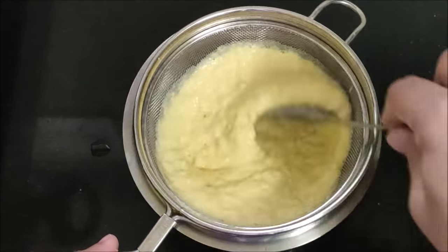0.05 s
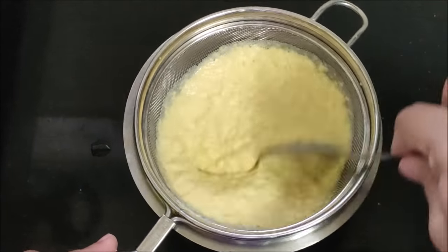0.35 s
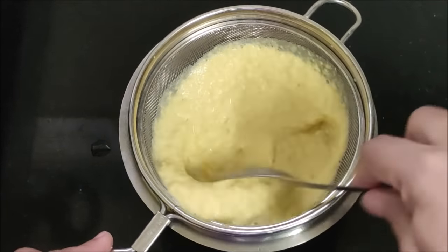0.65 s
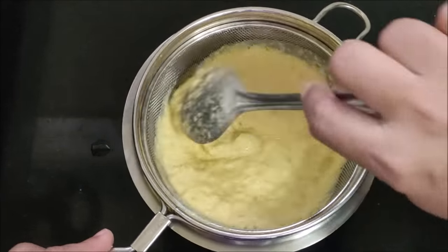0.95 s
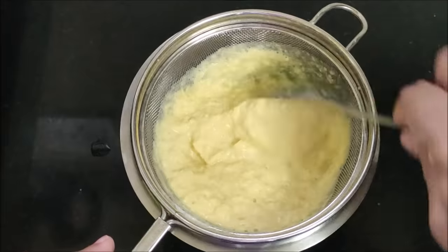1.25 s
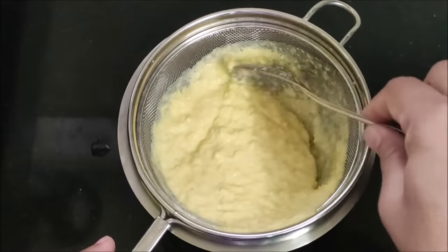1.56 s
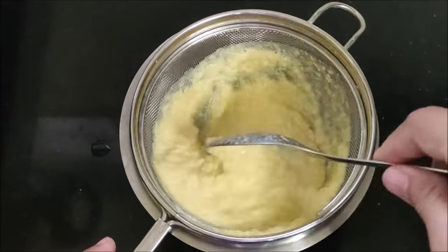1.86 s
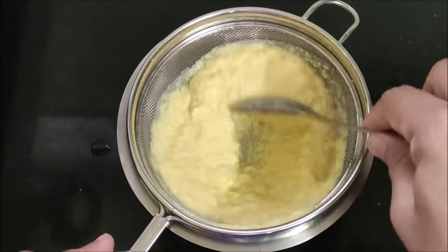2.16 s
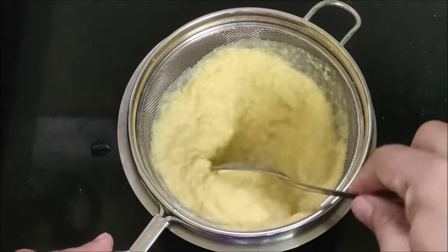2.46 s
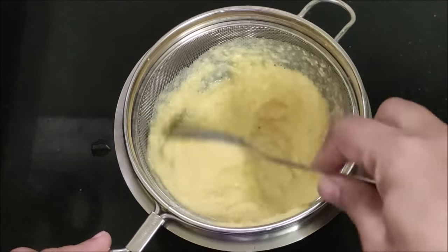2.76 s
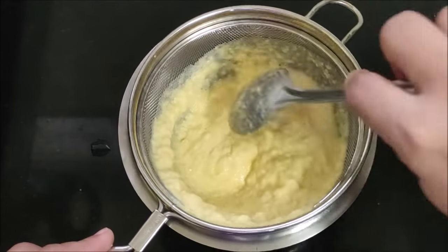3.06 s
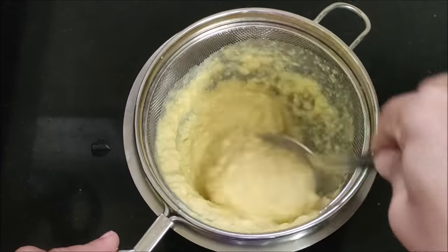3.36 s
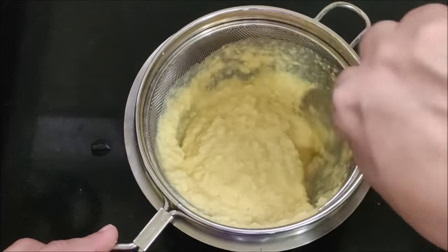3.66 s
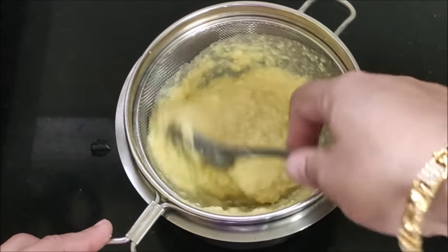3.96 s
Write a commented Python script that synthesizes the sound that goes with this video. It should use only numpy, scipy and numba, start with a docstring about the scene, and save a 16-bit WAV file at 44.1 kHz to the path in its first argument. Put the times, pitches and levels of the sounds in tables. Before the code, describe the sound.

A metal spoon scrapes thick paste through a wire strainer in short, rasping strokes.

```python
"""A metal spoon pushes thick paste through a wire strainer resting on a steel bowl, in a faintly humming kitchen.
From the start, short scrapes rasp and grind by stick-slip friction; the mesh drones at the wire-crossing rate
and the bowl rings. After a lull the spoon lands with a tick and a knock at 1.1 s, then squeals and zips
near 1.35 s. Scattered strokes and knocks follow, each with a short room tail, and a dense run of scrapes
from 3.7 s ends the scene."""
import sys
import numpy as np
from scipy import signal
from scipy.fft import rfft, irfft
from scipy.io import wavfile
from scipy.ndimage import map_coordinates
from numba import njit

SR = 44100
rng = np.random.default_rng(int(sys.argv[2]) if len(sys.argv) > 2 else 0)


def waveform_to_disk(signal):
    """Save audio, clipped to [-1, 1], as 16-bit WAV at the path in sys.argv[1]."""
    frames = np.transpose(np.atleast_2d(signal))
    scaled = np.clip(frames, -1, 1) * 32767
    samples = np.round(scaled).astype(np.int16)
    wavfile.write(sys.argv[1], SR, samples)


N = 176400

# Levels in the tables are relative; each source and the mix apply their own gains.
# Still kitchen air: frequency_hz, density_db
AIR_SPECTRUM = [(15, -14), (26, 8.5), (60, -7), (90, -5.5), (125, -12.5), (250, -13.5), (500, -23.5),
                (1000, -28), (3000, -35.5), (9000, -40), (16000, -42)]
# Harmonics of an appliance: pitch_hz, level_db
HUM_PARTIALS = [(49, -54), (98.5, -65), (147.5, -71.5)]
# Reverberation time by band: frequency_hz, t60_s
ROOM_DECAY = [(100, 0.11), (500, 0.68), (1400, 0.5), (4000, 0.6), (10000, 0.41), (16000, 0.24)]
# Normal modes of strainer and bowl: pitch_hz, level_db, t60_s
BOWL_MODES = [(243.4, -1.5, 0.41), (272.7, -1.5, 0.12), (301.4, -1, 0.32), (357, 1.5, 0.19),
              (452.6, 7.5, 0.14), (581, -12.5, 0.95), (611, -3.5, 0.33), (831, -4, 0.1), (1096, -2.5, 0.14),
              (1200, -1, 0.074), (1330, -4.5, 0.12), (1430, 1.5, 0.065), (1622, -12, 0.1),
              (2190, -40, 0.038)]
# The spoon lands or the strainer shifts: start_s, tick_db, tick_decay_s, knock_db, knock_cutoff_hz
IMPACTS = [(.075, -44.5, 0.0027, -45.5, 1360), (.275, -35.5, 0.005, -45, 1000),
           (.658, -33.5, 0.0085, -49, 1390), (.83, -40, 0.0042, -48.5, 2000),
           (1.128, -37.5, 0.0042, -40, 1013), (1.142, -44.5, 0.0037, -47, 991),
           (1.224, -44.5, 0.004, -56, 1380), (1.351, -27, .003, -61, 1390),
           (1.671, -38.5, .003, -39.5, 1400), (2.071, -31.5, 0.0025, -38.5, 1100),
           (2.422, -41.5, 0.0022, -37, 401), (2.718, -40, 0.0082, -47.5, 1395),
           (3.241, -37.5, 0.0027, -43, 895), (3.262, -35.5, 0.0031, -39, 700),
           (3.606, -44, 0.0048, -50, 1408), (3.682, -55.5, .003, -51.5, 1404)]
# Crunch of the wires at an impact: frequency_hz, density_db
TICK_SPECTRUM = [(200, -25), (700, -3), (1300, 7.5), (2500, 0), (4500, -0.5), (7500, 4.5), (12000, 6),
                 (16000, 0)]
# The edge catches and sings: start_s, rise_s, hold_s, pitch_hz, level_db
SQUEAL_EVENTS = [(0.138, .002, 0.012, 1190, -49), (0.289, .008, 0.0087, 1220, -38.5),
                 (0.301, .006, 0.019, 1514, -42.5), (0.446, 0.0099, 0.012, 1250, -45.5),
                 (.656, 0.0048, 0.019, 1113, -32.5), (.657, 0.0032, 0.015, 1282, -41),
                 (.829, 0.0025, 0.0055, 1294, -40.5), (.83, 0.0032, .014, 1120, -45),
                 (1.325, 0.022, .015, 1476, -37), (1.358, 0.0047, 0.0096, 1410, -27.5),
                 (1.393, .005, 0.016, 1120, -38), (1.395, 0.0046, 0.011, 1640, -48.5),
                 (2.161, 0.0029, 0.019, 1087, -41), (2.486, .015, 0.013, 1632, -41.5),
                 (2.5, 0.0087, 0.012, 1396, -38.5), (3.728, .01, 0.054, 1430, -44.5),
                 (3.836, .01, 0.021, 1432, -43)]
# The edge runs evenly over the wires: start_s, rise_s, hold_s, nominal_crossing_hz, level_db
ZIP_EVENTS = [(1.354, 0.012, 0.026, 487.4, -34), (1.391, 0.0041, 0.01, 556, -37),
              (3.764, 0.007, 0.048, 477.2, -43)]
# Timbre of a zip: frequency_hz, density_db
ZIP_SPECTRUM = [(480, 9), (950, -14), (1450, -10), (2000, 15), (2450, 1), (2900, -55), (3900, 9), (5000, 3),
                (6400, 6), (10000, -8), (16000, -14)]
# Rub of the spoon's edge: frequency_hz, density_db
RUB_SPECTRUM = [(400, -33), (880, -11), (1120, -0.5), (1420, 1), (1700, -9), (2300, -11.5), (4000, -32.5)]
# Resonances of the mesh under hard grinding: centre_hz, width_hz, level_db
GRIND_RESONANCES = [(832, 120, 9), (1046, 120, -0.5), (1990, 210, -3.5), (2274, 230, -5.5),
                    (3350, 116, -4.5), (4300, 600, -2.5), (6100, 500, -7)]
# Bright resonances of single wires: centre_hz, width_hz, level_db
WIRE_RESONANCES = [(5730, 95, -2), (6830, 105, 0.5), (8110, 230, -3), (9310, 320, 3.5), (10660, 240, 1),
                   (12300, 270, -0.5), (14200, 220, -4.5)]
# Rasp of the wires: frequency_hz, density_db
RASP_SPECTRUM = [(150, -44), (300, -41), (850, -16.5), (1300, -11), (2200, 4.5), (3000, 2), (4200, 0.5),
                 (5200, -4.5), (6800, 2.5), (9300, 4), (12000, 2), (14500, 1), (16000, -12.5)]
# Strokes of the spoon: start_s, rise_s, hold_s, crossing_hz, rasp_db, rub_db, drone_db, grind_db
STROKES = [ (-.02, .014, 0.046, 500, -45.5, -49.5, -37, -48.5),
           (0.138, 0.0034, 0.011, 500.4, -54.5, -46, -49, -60),
           (0.155, 0.0085, 0.061, 490, -57, -68, -51.5, -61),
           (0.276, 0.02, 0.022, 458, -34.5, -40, -25.5, -52),
           (0.344, .007, 0.059, 480, -48.5, -59, -36.5, -56),
           (0.424, 0.0064, 0.034, 520, -40.5, -44, -45, -50),
           (0.539, 0.026, 0.032, 499, -50, -55.5, -49, -69),
           (0.651, 0.011, 0.016, 561.2, -34.5, -38, -36, -41),
           (.68, 0.0037, .016, 480.3, -45, -58, -27.5, -56), (.708, 0.013, 0.082, 510, -52, -65, -39, -70),
           (.812, .02, 0.0052, 548.4, -56, -44, -51.5, -64),
           (1.229, 0.031, 0.064, 490, -47.5, -55.5, -48.5, -55.5),
           (1.331, .014, 0.0089, 561.6, -31, -35.5, -47.5, -53),
           (1.362, 0.013, 0.027, 545, -29, -40.5, -44.5, -44),
           (1.671, 0.0058, 0.05, 480, -39, -41.5, -37.5, -46),
           (1.735, 0.017, 0.027, 475, -30.5, -37, -28, -40),
           (1.779, 0.01343, 0.035, 375, -46, -45, -34.5, -46.5),
           (2.141, 0.0055, 0.03, 450, -45.5, -45, -40, -51.5),
           (2.189, 0.014, 0.017, 510, -58.5, -69, -44, -62.5),
           (2.459, .02, 0.023, 490, -43.5, -44.5, -40.5, -53),
           (2.497, .006, .012, 490, -37, -49, -32.5, -42.5),
           (2.712, 0.0072, 0.027, 474, -33, -40.5, -43, -40),
           (2.743, 0.0059, 0.04, 490, -38, -42, -37, -43),
           (2.8, .025, 0.025, 440.1, -32, -35.5, -28.5, -36.5),
           (2.864, 0.0053, 0.036, 436.9, -44.5, -47.5, -32, -48.5),
           (3.243, 0.0095, 0.068, 441.5, -40, -44, -43, -47),
           (3.343, 0.061, 0.015, 490.1, -41, -42, -50, -41),
           (3.672, 0.01, 0.082, 463.7, -45, -49, -53.5, -51),
           (3.714, 0.041, 0.06, 472.3, -31.5, -41.5, -33.5, -45),
           (3.814, 0.012, 0.02, 446.4, -33.5, -42, -28, -41),
           (3.846, 0.026, 0.059, 425.9, -36.5, -42, -38, -36.5),
           (3.882, 0.067, .09, 469.4, -32, -39.5, -41.5, -35)]

WOBBLE_HZ, FLUTTER_DB = 249.5, 3.5  # rate of the tones' random wavering; spread of their level
TONE_RELEASE_S = 0.0082  # squeals and zips


def undb(db):
    """Amplitude ratio of a level in decibels."""
    return 10 ** (np.asarray(db) / 20)


def unit(x):
    """Normalisation to an rms of 1."""
    return x / np.sqrt(np.mean(x ** 2))


def along(points, hz):
    """Interpolation of (frequency_hz, value) points on a logarithmic frequency axis."""
    p = np.array(points)
    return np.interp(np.log(hz + 1), np.log(p[:, 0]), p[:, 1])


def colour(x, spectrum):
    """Spectral shaping that conserves the power of white noise."""
    hz = np.arange(N + 1) * SR / (2 * N)
    return irfft(rfft(x, 2 * N) * unit(undb(along(spectrum, hz))))[:N]


def wander(hz):
    """Random modulation: interpolated Gaussian values with a spread near 1."""
    knots = rng.standard_normal(8000)
    return np.sqrt(1.5) * np.interp(np.arange(N) / SR * hz, np.arange(len(knots)), knots)


def pole(x, hz, kind):
    """First-order low-pass or high-pass filter."""
    return signal.lfilter(*signal.butter(1, min(hz, SR / 3), kind, fs=SR), x)


def pressure(t, start, rise, hold, release):
    """Contact envelope: a linear rise, a hold and an exponential release."""
    bearing_down = np.clip((t - start) / max(rise, .001), 0, 1)
    return bearing_down * np.exp(-np.maximum(t - start - rise - hold, 0) / release)


def wavering_phase(hz, wobble):
    """Frequency modulation: phase is the integral of a wavering rate."""
    return 2 * np.pi * np.cumsum(hz * (1 + wobble * wander(WOBBLE_HZ))) / SR


@njit
def resonance(x, hz, width):
    """Damped resonator: a state-variable band-pass with a moving centre."""
    y, band_state, low_state = np.empty(len(x)), 0., 0.
    for i in range(len(x)):
        g, damping = np.tan(np.pi * hz[i] / SR), width / hz[i]
        band = (band_state + g * (x[i] - low_state)) / (1 + g * (g + damping))
        band_state = 2 * band - band_state
        low_state += 2 * g * band
        y[i] = damping * band
    return y


def background(t, air_db=-54.5, air_width=0.39):
    """Superposition of broadband air noise and an appliance's harmonic hum."""
    mid, side = (unit(colour(rng.standard_normal(N), AIR_SPECTRUM)) for _ in range(2))
    hum = sum(undb(db) * unit(np.sin(2 * np.pi * (hz * t + 0.033 * wander(2.58) + rng.random())))
              for hz, db in HUM_PARTIALS)
    return hum + undb(air_db) * (mid + air_width * side * np.array([[1], [-1]]))


def kitchen(x, early_db=-1.5, early_s=0.016, tail_db=-6, build_s=0.011, wide_hz=405, lag_s=32e-6):
    """Reverberation: direct sound, reflections off bowl and worktop, and a diffuse tail, in stereo."""
    t = np.arange(SR // 2) / SR
    hz = np.arange(len(t) // 2 + 1) * SR / len(t)
    mid, side = rfft(rng.standard_normal((2, len(t))))
    side *= hz ** 2 / np.hypot(hz ** 2, wide_hz ** 2)  # the room is wider in the treble
    diffuse = np.array([mid + side, mid - side]) / np.sqrt(2)
    early = np.exp(-t / early_s) * (t > .001)
    response = undb(early_db) * pole(irfft(diffuse) * early, hz=730, kind="high") / np.linalg.norm(early)
    for centre, t60 in ROOM_DECAY:
        band = along([(f, float(f == centre)) for f, _ in ROOM_DECAY], hz)
        tail = np.exp(-np.log(1000) * t / t60) * np.minimum(t / build_s, 1)
        response += undb(tail_db) * irfft(diffuse * band)[:, ::-1] * tail / np.linalg.norm(tail)
    delay = np.exp(-2j * np.pi * np.arange(N // 2 + 1) * SR / N * lag_s)
    direct = np.array([irfft(rfft(x[0]) * delay, N), x[1]])  # reaches the left side later
    return direct + signal.fftconvolve(x, response, axes=1)[:, :N]


def bowl_ring():
    """Modal superposition: the impulse response of strainer and bowl, with unit energy."""
    t = np.arange(SR // 2) / SR
    ring = sum((-1) ** k * undb(db) * np.cos(2 * np.pi * hz * t) * np.exp(-np.log(1000) * t / t60)
               for k, (hz, db, t60) in enumerate(BOWL_MODES))
    return ring / np.linalg.norm(ring)


def impacts(t, ring):
    """Impulsive excitation: the wires crunch briefly and a cushioned blow rings the bowl."""
    crunch, blows = np.zeros(N), np.zeros(N)
    tick_gain, knock_gain = 2, 2 * np.sqrt(0.02 * SR)
    for start, tick_db, decay_s, knock_db, cutoff_hz in IMPACTS:
        crunch += undb(tick_db) * (t >= start) * np.exp(-np.abs(t - start) / decay_s)
        impulse = 1e-18 + (np.arange(N) == int(start * SR))
        blows += undb(knock_db) * pole(impulse, cutoff_hz, "low")
    ticks = colour(tick_gain * crunch * rng.standard_normal(N), TICK_SPECTRUM)
    return ticks + signal.fftconvolve(knock_gain * blows, ring)[:N]


def squeals(t, overtone_db=-23.5):
    """Stick-slip oscillation: the spoon's edge sings in short, unsteady harmonic tones."""
    out = np.zeros(N)
    phase_per_hz = wavering_phase(1, wobble=.027)
    flutter = unit(undb(FLUTTER_DB * wander(WOBBLE_HZ)))
    for start, rise, hold, hz, db in SQUEAL_EVENTS:
        on = (t > start) & (t < start + .5)
        phase = hz * phase_per_hz[on]
        tone = np.sin(phase) + undb(overtone_db) * sum(np.sin(k * phase) for k in range(2, 6))
        out[on] += undb(db) * pressure(t[on], start, rise, hold, TONE_RELEASE_S) * unit(tone)
    return out * flutter


def rim_echo(x, reflection=0.76, lag_s=0.0006966, swing=0.365, travel_hz=12):
    """Comb filtering: a wave returns from the rim along a path that changes as the spoon travels."""
    lag = lag_s * SR * np.exp(swing * wander(travel_hz))
    return (x + reflection * map_coordinates(x, [np.arange(N) - lag])) / np.hypot(1, reflection)


def zips(t, rate_ratio=0.96):
    """Periodicity pitch: one click per wire makes a buzz, just below the nominal crossing rate."""
    out = np.zeros(N)
    cycles_per_hz = wavering_phase(rate_ratio, wobble=0.0132) / (2 * np.pi)
    for start, rise, hold, hz, db in ZIP_EVENTS:
        clicks = np.sinc((hz * cycles_per_hz % 1 - .5) * SR / hz)
        out += undb(db) * pressure(t, start, rise, hold, TONE_RELEASE_S) * unit(clicks)
    return colour(rim_echo(out), ZIP_SPECTRUM)


def snags(grip, per_s=5200, spread_db=3):
    """Shot noise: the edge catches on the wires in random impulses of very uneven size."""
    sizes = rng.choice([-1, 1], N) * undb(spread_db * np.minimum(rng.exponential(size=N), 5))
    return unit((rng.random(N) < per_s / SR) * sizes * grip)


def ringing_wires(x, resonances, drift=0.041, flicker_db=4, shift_hz=30.25):
    """Resonance: snags ring stretches of wire whose pitch and strength shift as the edge moves on."""
    out = np.zeros(N)
    for hz, width, db in resonances:
        gain = undb(db + flicker_db * wander(shift_hz))
        centre = hz * np.exp(drift * wander(shift_hz))
        out += gain * resonance(x, centre, float(width))
    return unit(out)


def mesh_drone(phase, skew_rad=0.29, turn_hz=43.3, octave_db=-25.5):
    """Forced vibration, once per wire: the swinging patch shifts, so the two sides hear it out of step."""
    skew = skew_rad * wander(turn_hz) * np.array([[1], [-1]])
    tone = np.sin(phase + skew) + undb(octave_db) * np.sin(2 * phase)
    return unit(tone * undb(FLUTTER_DB * wander(WOBBLE_HZ)))


def wire_rasp(envelope, grip, width=0.94, bright_db=-1.5):
    """Extended source: the mesh is broad and close, so each side hears shared snags and its own."""
    shared, left, right = (rim_echo(colour(snags(grip) * envelope, RASP_SPECTRUM)) for _ in range(3))
    broadband = (shared + width * np.array([left, right])) / np.hypot(1, width)
    bright = np.array([ringing_wires(snags(grip, per_s=1700), WIRE_RESONANCES) for _ in range(2)])
    return (broadband + undb(bright_db) * envelope * bright) / np.hypot(1, undb(bright_db))


def stroke_envelopes(t, glide_db=-62, glide_fade_s=0.19, release_s=0.011, drone_release_s=0.01471):
    """Summation of strokes: noises add in power, the drone in amplitude, which weights its rate."""
    contact = 1e-9 + np.max([pressure(t, *row[:3], glide_fade_s) for row in STROKES], axis=0)
    glide = undb(glide_db) * contact  # the spoon slides in the paste, fading as it lifts
    rasp, rub, grind, drone = glide, 0, 0, glide
    weighted_hz = glide * np.mean([row[3] for row in STROKES])
    for start, rise, hold, hz, rasp_db, rub_db, drone_db, grind_db in STROKES:
        push = pressure(t, start, rise, hold, release_s)
        rasp = np.hypot(rasp, undb(rasp_db) * push)
        rub = np.hypot(rub, undb(rub_db) * push)
        grind = np.hypot(grind, undb(grind_db) * push)
        swing = undb(drone_db) * pressure(t, start, rise, hold, drone_release_s)
        drone = drone + swing
        weighted_hz += hz * swing
    return rasp, rub, grind, drone, weighted_hz / drone


def scraping(t, ring, grip_db=2, grip_hz=169.14, slip_depth=.3, rasp_to_bowl_db=-23, drone_to_bowl_db=-9.5):
    """Sliding friction: snags rasp, rub and grind, the mesh drones, and both drive the bowl's modes."""
    rasp, rub, grind, drone, crossing_hz = stroke_envelopes(t)
    phase = wavering_phase(crossing_hz, wobble=0.0704)
    grip = undb(grip_db * wander(grip_hz)) * (1 + slip_depth * np.cos(phase))  # peaks once per wire
    wires = wire_rasp(rasp, grip)
    rubbing = rub * unit(colour(snags(grip), RUB_SPECTRUM))
    grinding = grind * ringing_wires(snags(grip), GRIND_RESONANCES)
    light_snags = pole(rasp * snags(grip), hz=700, kind="high")  # these hardly move the low modes
    shake = undb(rasp_to_bowl_db) * light_snags + undb(drone_to_bowl_db) * drone * snags(grip)
    bowl = signal.fftconvolve(shake, ring)[:N]
    return wires + rubbing + grinding + drone * mesh_drone(phase) + bowl


def scene():
    """Linear superposition: the spoon's sounds pass through the room and add to the background."""
    t = np.arange(N) / SR
    ring = bowl_ring()
    spoon = scraping(t, ring) + squeals(t) + zips(t) + impacts(t, ring)
    return undb(-4.5) * kitchen(spoon) + background(t)


def record(dry):
    """Band limiting: a steep elliptic low-pass removes the highest treble."""
    cutoff_hz = 16200
    return signal.sosfilt(signal.ellip(10, .2, 80, cutoff_hz, fs=SR, output="sos"), dry)


dry = scene()
out = record(dry)
waveform_to_disk(out)
```